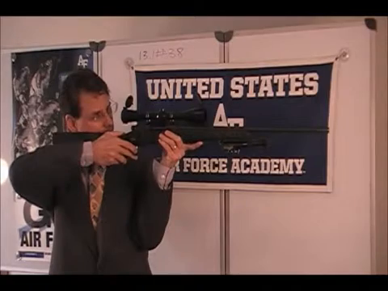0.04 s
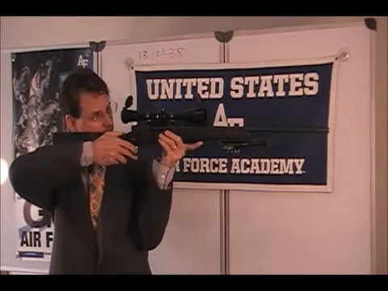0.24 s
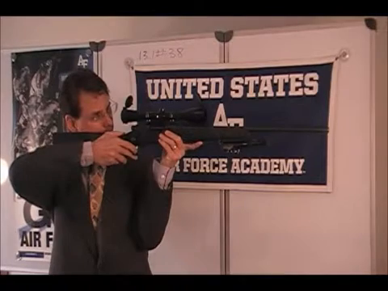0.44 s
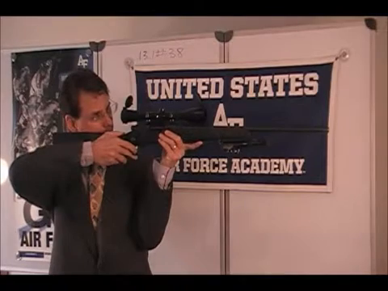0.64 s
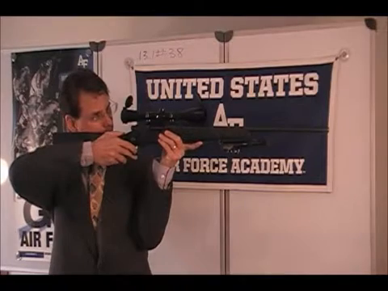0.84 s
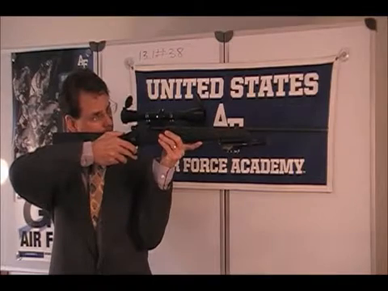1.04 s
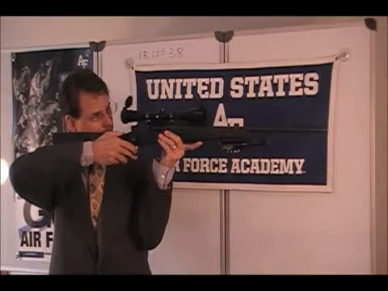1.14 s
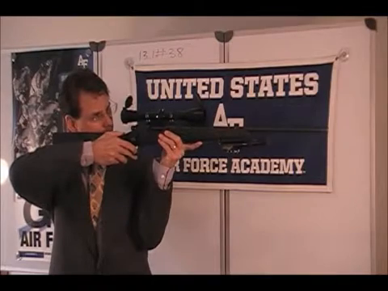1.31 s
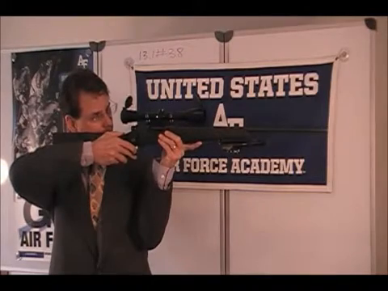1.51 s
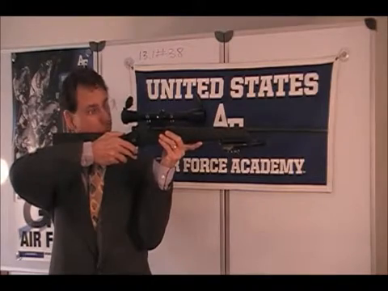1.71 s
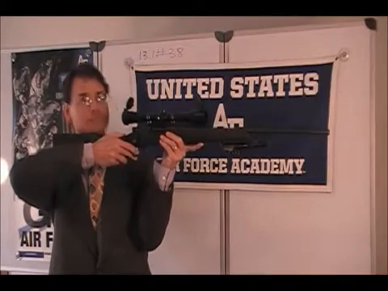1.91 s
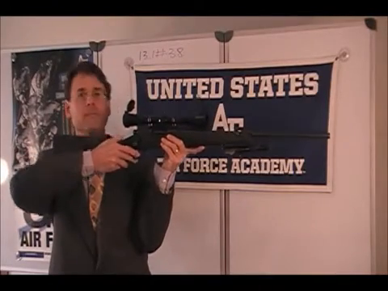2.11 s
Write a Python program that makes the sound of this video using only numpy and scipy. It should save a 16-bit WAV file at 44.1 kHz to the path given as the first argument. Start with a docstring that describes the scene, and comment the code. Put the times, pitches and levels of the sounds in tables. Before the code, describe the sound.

A rifle trigger is pulled on an empty chamber: after quiet ventilation noise, one loud, crisp metal snap with a short room echo and thin ring, then faint cloth rustle and tiny stock ticks, picked up in stereo.

```python
"""A bolt-action rifle is dry-fired in a small, bare, quiet room: sear, pin slam and rebounds crack and ring.
The crack is a burst of damped noise per contact; pin tip, steel and barrel are decaying sines.
Delayed echoes and banded noise tails answer as the room; automatic gain ducks under the snap and recovers.
Filtered noise brushes like a sleeve before and after, and the stock ticks softly in the hands.
Ventilation noise and a faint electrical hum run throughout."""
import sys
import numpy as np
from scipy import signal
from scipy.io import wavfile

SR = 44100
rng = np.random.default_rng(int(sys.argv[2]) if len(sys.argv) > 2 else 0)


def write(x):
    x = np.atleast_2d(x).T
    wavfile.write(sys.argv[1], SR, np.round(np.clip(x, -1, 1) * 32767).astype(np.int16))


N = 94947
TIME = np.arange(N) / SR  # seconds

# steady electrical hum and whine: pitch_hz, level_db [rms]
HUM_TONES = [(29, -67), (120, -66), (1023, -79), (1083, -77), (1143, -77.5), (2167.5, -71)]
# ventilation rumble and hiss: band_hz, gain_db, side_to_mid_db
VENTILATION = [(28, -47.5, -10.5), (50, -49.5, -6.5), (120, -47, 4), (251.6, -51.5, 9), (530, -53.5, 9),
               (990, -56.5, 9), (2000, -59.5, 5), (3870, -64, 1), (8000, -71, 0), (14000, -78.5, 0)]
# sleeve brushes: start_s, length_s, level_db [noise rms before the swell], centre_hz
SLEEVE_BRUSHES = [(.50, 0.23, -68.5, 3900), (1.915, 0.36, -67, 1920), (2.03, 0.18, -69, 4400)]
BRUSH_EDGE_RATIO = 1.12  # band edge to centre

# metal contacts of the action, sear, pin slam and rebounds: start_s, level_db
ACTION_CONTACTS = [(1.2850, -29), (1.2866, -9), (1.2877, -9), (1.2888, -3.5), (1.2899, -4), (1.2910, -3.5),
                   (1.2920, 4), (1.2933, -6)]
SLAM_S = 1.2888  # the firing pin hits home
# dense vibration of receiver and stock: band_hz, gain_db
CRACK_BANDS = [(30, -26), (70, -16.5), (140, 2), (300, -10), (600, 0.5), (1100, 1), (2000, 10), (4000, 6.5),
               (5700, 2), (8000, 14), (10500, 12.5), (13000, 4.5), (16000, -17)]
CRACK_T60_S, CRACK_SIDE_DB = .006, -13
# hard ping of the pin's tip: pitch_hz, level_db, t60_s
PIN_TIP_MODES = [(8940, 5.5, .0025)]
# ringing of bolt and receiver: pitch_hz, level_db, t60_s
STEEL_MODES = [(1130, -22, .03), (1701, -24, .06), (1885, -22, .07), (2500, -30, .025), (3024, -28, .07),
               (4010, -20, .035), (4120, -23, .1), (4215, -23.5, .12), (4364, -29, .08), (7500, -27, .015),
               (8404, -25, .07), (8580, -23.5, .1), (8685, -21.5, .11), (10700, -9, .017),
               (12560, -10, .019)]
# long, thin ring of barrel and spring: pitch_hz, level_db, t60_s
BARREL_MODES = [(686, -58, 1.4), (757, -57, 1.4), (1374, -56, 1.5), (1398, -42.5, 1.3), (1457, -48, 1.2),
                (2040, -42, .65), (3541, -57.5, 2.1), (4856, -60, 1.3), (8021, -59, 1.0)]

# first reflections: delay_s, level_db [before the echo filter], left_minus_right_db
WALL_REFLECTIONS = [(.0081, -1, 4.5), (.011, -15, 5.5), (.021, -9.5, 0.5), (.027, -6, -2)]
WALL_LOW_HZ, WALL_CUT_HZ = 500, 7000
# reverberation of the crack: band_hz, gain_db, t60_s, side_to_mid_db
ROOM_BANDS = [(39.84, -37, .4, -1), (119.4, -8, .5, -4.5), (230, 2, .9, -3), (500, 11.5, 0.43, -12.5),
              (1000, 16, 0.48, -9), (1947, 18, 0.48, -11), (3940, 20, 0.49, -5.5), (5830, 14.5, .48, -4),
              (7500, 21, 0.43, -5.5), (9946, 18.5, 0.34, 3), (12500, -2, 0.15, -2), (15025, -15, .3, -4.5)]
ROOM_DELAY_S, ROOM_BUILD_S = .0053, .008
STEEL_ROOM_DB, TICK_ROOM_DB = -14.5, -23  # sends to the reverberation

# stock ticks in the hands, each with its own thinness: start_s, level_db [before the filter], low_edge_hz
STOCK_TOUCHES = [(2.0055, -44, 600), (2.0078, -51, 1498), (2.0882, -46, 2600), (2.1075, -56, 1200)]
# the stock's modes: pitch_hz, level_db [relative to the touch], t60_s
STOCK_MODES = [(940, 2, 0.011), (1220, 3, 0.0063), (2260, 0, 0.012)]

GAIN_THRESHOLD_DB, GAIN_SLOPE = -7.5, .68  # slope: dB of ducking per dB over threshold
GAIN_ATTACK_S, GAIN_RELEASE_DB_PER_S = .006, 62
CEILING = 1.0  # full scale
STOPBAND_HZ = 16500  # fully cut from here up


def from_db(db):
    """Decibels to gain."""
    return 10 ** (np.asarray(db) / 20)


def at_hz(table, hz):
    """The columns of a table, read on a log-frequency axis."""
    freqs, *columns = np.transpose(table)
    return [np.interp(np.log(hz), np.log(freqs), column) for column in columns]


def bandpass(x, low_hz, high_hz):
    """Second-order Butterworth band design, keeping what lies between two edges."""
    return signal.sosfilt(signal.butter(2, [low_hz, high_hz], "band", fs=SR, output="sos"), x)


def convolve(x, response):
    """Pass a sound through a mono or stereo response."""
    return signal.fftconvolve(np.atleast_2d(x), np.atleast_2d(response), axes=-1)[:, :N]


def stereo_noise(shape):
    """Third-octave noise bands; shape(hz) gives each band's gain or envelope and its side-to-mid dB."""
    edges = 20 * 2 ** (np.arange(30) / 3)
    white = rng.standard_normal((2, 2, N))
    out = 0
    for k, (low, high) in enumerate(zip(edges, edges[1:])):
        mid, side = bandpass(white[k % 2], low, high)  # neighbouring bands use separate noise
        gain, side_db = shape(np.sqrt(low * high))
        out = out + gain * (mid + from_db(side_db) * side * [[1], [-1]])
    return out


def dying(t60, build=0):
    """Decay envelope of unit energy, with an optional build-up."""
    envelope = np.exp(-np.minimum(np.log(1000) * TIME / t60, 40))
    if build:
        envelope = envelope * (1 - np.exp(-TIME / build))
    return envelope / np.sqrt(np.sum(envelope ** 2))


def clicks(rows):
    """One impulse for each (start_s, level_db) row."""
    out = np.zeros(N)
    for start_s, level_db in rows:
        out[int(start_s * SR)] += from_db(level_db)
    return out


def ringing(modes):
    """Response of a struck body: decaying sines, neighbours in opposite sign."""
    out = np.zeros(N)
    for k, (pitch_hz, level_db, t60_s) in enumerate(modes):
        decay = np.exp(-np.log(1000) * TIME / t60_s)
        out += (-1) ** k * from_db(level_db) * decay * np.sin(2 * np.pi * pitch_hz * TIME)
    return out


def room_tone():
    """Ventilation as shaped stereo noise, with steady electrical sines at random phase."""
    def band(hz):
        gain_db, side_db = at_hz(VENTILATION, hz)
        return from_db(gain_db), side_db

    hum = 0
    for pitch_hz, level_db in HUM_TONES:
        amplitude = np.sqrt(2) * from_db(level_db)  # rms to peak
        hum = hum + amplitude * np.sin(2 * np.pi * (pitch_hz * TIME + rng.random()))
    return stereo_noise(band) + hum


def sleeve():
    """Cloth brushes: a quick swell of soft friction noise that fades."""
    out = 0
    for start_s, length_s, level_db, centre_hz in SLEEVE_BRUSHES:
        white = rng.standard_normal((2, N))
        noise = bandpass(white, centre_hz / BRUSH_EDGE_RATIO, centre_hz * BRUSH_EDGE_RATIO)
        progress = np.clip((TIME - start_s) / length_s, 0, 1)
        swell = np.sin(np.pi * np.sqrt(progress))  # the root makes it rise faster than it falls
        out = out + from_db(level_db) * noise / noise.std() * swell
    return out


def crack():
    """Each contact adds energy to a burst of dense, quickly damped vibration."""
    energy = convolve(clicks(ACTION_CONTACTS) ** 2, dying(CRACK_T60_S) ** 2)
    envelope = np.sqrt(np.abs(energy))
    return envelope * stereo_noise(lambda hz: (from_db(at_hz(CRACK_BANDS, hz)[0]), CRACK_SIDE_DB))


def struck_metal(slam):
    """The slam sets pin tip, steel and barrel ringing, each in its own damped modes."""
    return [convolve(slam, ringing(modes)) for modes in (PIN_TIP_MODES, STEEL_MODES, BARREL_MODES)]


def wall_echoes():
    """Response of the nearest walls: a few thinned and dulled echoes."""
    echoes = []
    for side in (1, -1):  # left, right
        rows = [(delay_s, level_db + side * pan_db / 2) for delay_s, level_db, pan_db in WALL_REFLECTIONS]
        echoes.append(clicks(rows))
    return bandpass(echoes, WALL_LOW_HZ, WALL_CUT_HZ)


def reverberation():
    """Diffuse room response: noise that builds, then dies band by band."""
    def band(hz):
        gain_db, t60_s, side_db = at_hz(ROOM_BANDS, hz)
        return from_db(gain_db) * dying(t60_s, ROOM_BUILD_S), side_db

    delay = int(ROOM_DELAY_S * SR)
    return np.pad(stereo_noise(band), ((0, 0), (delay, 0)))[:, :N]


def stock_ticks():
    """Light touches set the stock's damped modes ringing briefly."""
    touches = 0
    for start_s, level_db, low_edge_hz in STOCK_TOUCHES:
        highpass = signal.butter(2, low_edge_hz, "high", fs=SR, output="sos")
        touches = touches + signal.sosfilt(highpass, clicks([(start_s, level_db)]))
    return convolve(touches, ringing(STOCK_MODES))


def scene():
    """The snap and the small handling sounds in the room."""
    slam = clicks([(SLAM_S, 0)])
    ping, steel, barrel = struck_metal(slam)
    snap = crack() + ping + steel
    ticks = stock_ticks()
    ring_send = from_db(STEEL_ROOM_DB) * steel + from_db(TICK_ROOM_DB) * ticks
    echoes = convolve(snap, wall_echoes())
    # the slam and the ringing each excite their own draw of the diffuse tail
    tails = convolve(slam, reverberation()) + convolve(ring_send, reverberation())
    return room_tone() + sleeve() + snap + barrel + echoes + tails + ticks


def record(dry):
    """Gain ducks after a peak and recovers steadily; overloads clip and the extreme top is cut."""
    peak_db = 20 * np.log10(np.abs(dry).max(axis=0) + 1e-9)
    duck_db = np.maximum(peak_db - GAIN_THRESHOLD_DB, 0) * GAIN_SLOPE
    # hold the deepest ducking, released at a constant rate in dB
    recovery_db = GAIN_RELEASE_DB_PER_S * TIME
    held_db = np.maximum.accumulate(duck_db + recovery_db) - recovery_db
    # the attack lag lets the first of the snap through
    lag = np.exp(-1 / (GAIN_ATTACK_S * SR))
    smooth_db = signal.lfilter([1 - lag], [1, -lag], held_db)
    clipped = np.clip(dry * from_db(-smooth_db), -CEILING, CEILING)
    lowpass = signal.cheby2(12, 70, STOPBAND_HZ, fs=SR, output="sos")
    return signal.sosfilt(lowpass, clipped)


dry = scene()
out = record(dry)
write(out)
```